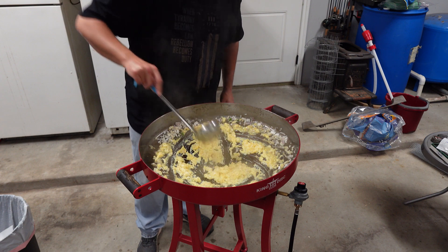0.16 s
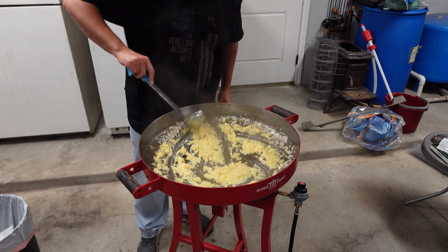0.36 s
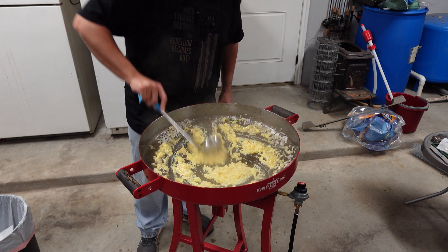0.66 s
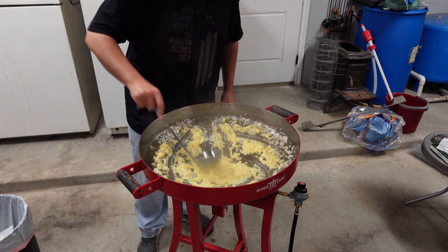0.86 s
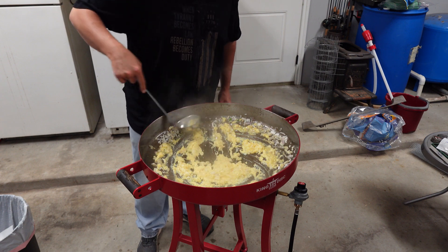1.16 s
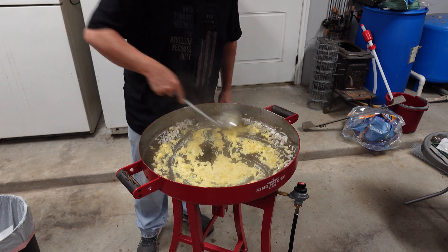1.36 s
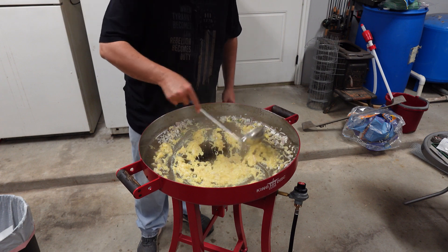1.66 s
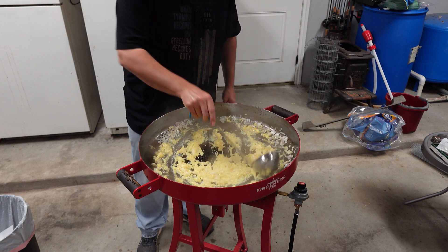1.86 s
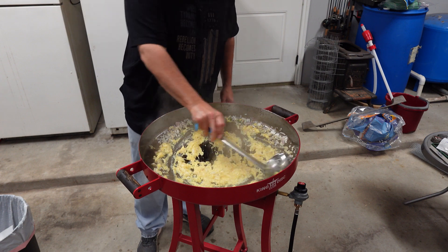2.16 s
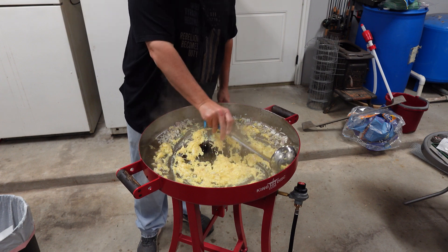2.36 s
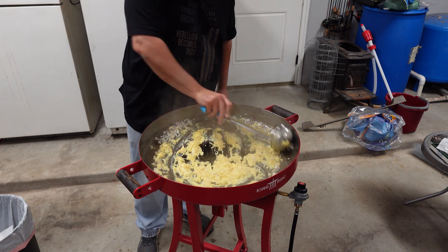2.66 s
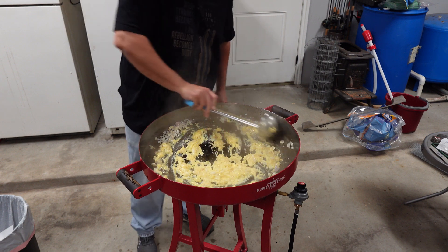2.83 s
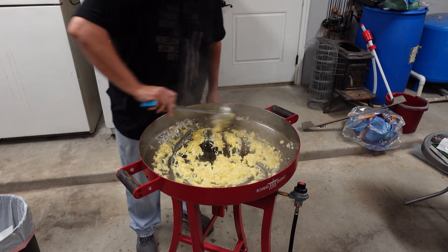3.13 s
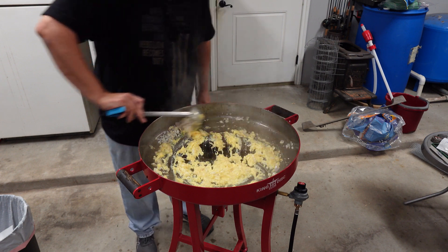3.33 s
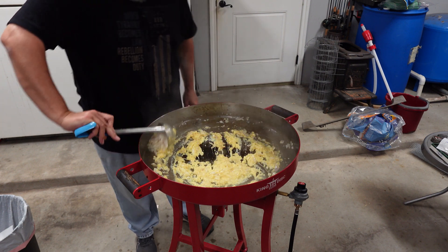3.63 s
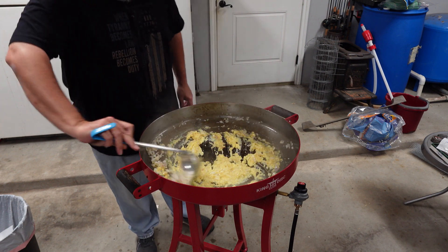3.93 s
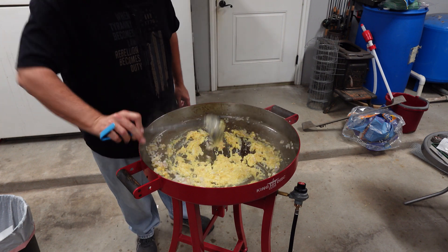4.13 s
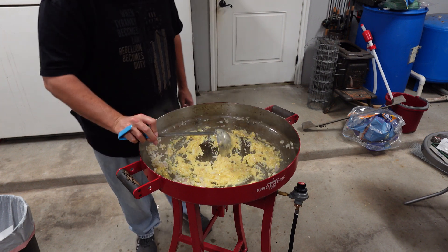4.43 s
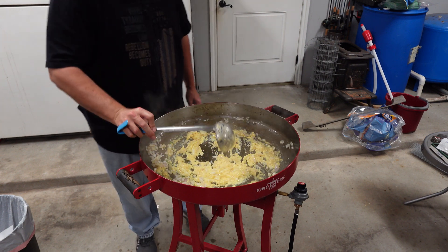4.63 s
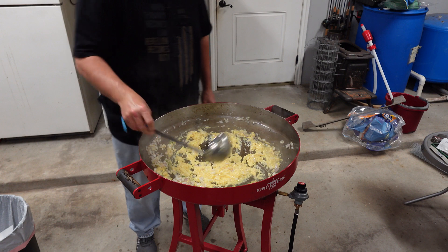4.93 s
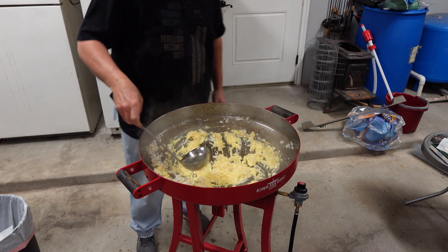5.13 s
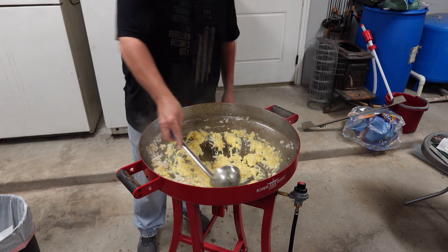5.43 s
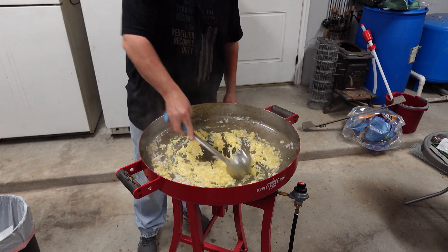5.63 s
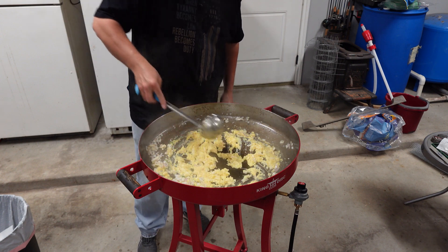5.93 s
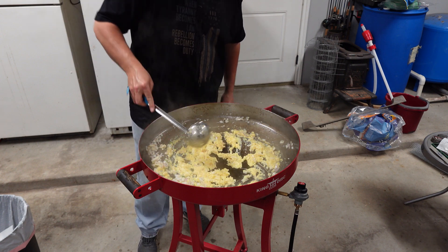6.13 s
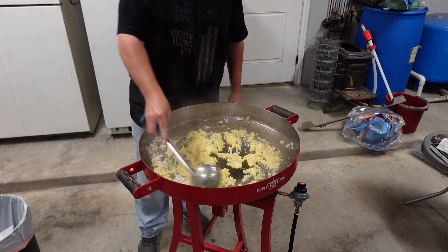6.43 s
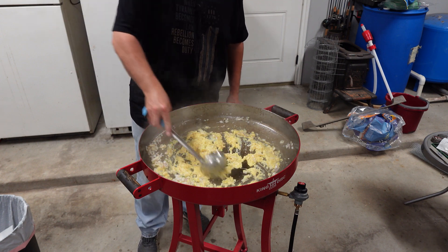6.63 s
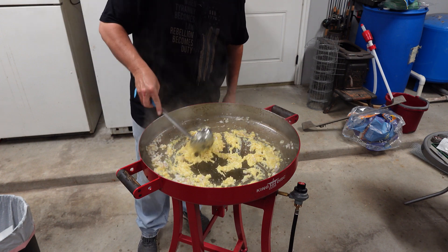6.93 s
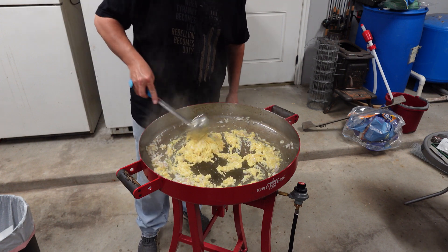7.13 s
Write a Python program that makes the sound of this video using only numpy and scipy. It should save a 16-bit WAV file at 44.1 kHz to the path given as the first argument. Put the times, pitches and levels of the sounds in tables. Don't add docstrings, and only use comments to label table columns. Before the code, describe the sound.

A close microphone hears a big steel pan of eggs frying in a garage: constant fine fizz, scattered oil pops and a very low burner roar. The pan rim is already humming at the start. At 0.5-0.9 s the ladle clacks, nudges and scrapes softly, with dull thumps from the stand. A very loud clang hits at 1.2 s, with a bright double hit near 1.34 s, a duller knock at 1.5 s, and another very loud, rounder clang at 2.1 s with a follow-up at 2.25 s. From 2.5 to 3.9 s a gritty metallic scrape travels round the wall, strongest around 2.85-3.25 s, then weakens with small taps. From 4 to 5.5 s only quieter sizzle and a faint rim ring remain. A harsh, bright sweep with clicks bursts at 5.55-5.88 s; frying swells and pops around 6 s. A light tick and scrape comes at 6.75 s, then sizzling continues to 7.3 s.

```python
import sys
import numpy as np
from scipy import signal
from scipy.fft import rfft, irfft, next_fast_len
from scipy.io import wavfile
from scipy.ndimage import uniform_filter1d, map_coordinates

SR = 44100
rng = np.random.default_rng(int(sys.argv[2]) if len(sys.argv) > 2 else 0)


def invert_db(level):
    return 10 ** (np.asarray(level, dtype=float) / 20)


def persist_wave(psi):
    counts = np.round(np.clip(psi, -1, 1) * 32767).astype(np.int16)
    wavfile.write(sys.argv[1], SR, np.atleast_2d(counts).T)


N = 321489

RIM_BLOWS = [
    0,
    1.348,
    2.10,
    3.55,
]
RIM_HZ = [554.3, 585.2, 707.6, 732.6, 869, 883, 896.7, 1058.5]
# [t60/s, start level/dB rms after each of the first three blows]
RIM_MODES = [(3.77, -35, -32.5, -52), (4.2, -54, -59, -70), (4, -36.5, -53, -41), (1.34, -34.5, -51, -29.5),
             (1.22, -34, -59, -30), (0.75, -70, -65, -23), (3.2, -38.5, -45, -50), (2.15, -43.5, -45, -62)]
RIM_LIFT_DB = [-60.5, -80, -52, -46.5, -68, -81, -66, -48.5]
LIFTED_RING = 1.43
RIM_TOUCH_S, RIM_TOUCH_DB = .493, -5

# [t/s, fizz level/dB]
FIZZ = [(0, -37.5), (.45, -43.5), (1.1, -42), (1.5, -41), (1.899, -43), (2.15, -47.5), (2.4, -47),
        (3.198, -40.5), (4.062, -50.5), (4.6, -50.5), (5.3, -52), (5.6, -51.5), (5.9, -41), (6.25, -44),
        (6.44, -46.5), (6.8, -45.5), (7.29, -42)]
# [f/Hz, level/dB]
FIZZ_COLOUR = [(300, -14), (900, -5.5), (2500, -4.5), (4200, -4), (6400, 0), (8000, -2.5), (9500, -11.5),
               (16000, -18.5)]
# [t/s, peak level/dB, f/Hz]
POPS = [(0.232, -25, 7000), (0.4325, -31, 6840), (0.618, -19, 5650), (0.6345, -17, 2650),
        (1.149, -28, 6800), (1.154, -25, 8200), (1.5714, -30, 5670), (1.582, -24, 6700), (1.961, -27, 6100),
        (1.995, -27, 7100), (2.505, -35, 2750), (4.145, -32, 6140), (4.342, -26.5, 6940),
        (5.179, -34, 7550), (5.5194, -32, 7000), (5.9554, -31, 2830), (5.9884, -28, 6750),
        (6.067, -23, 4500), (6.1203, -25, 4700), (6.135, -21.5, 2540), (6.23, -26, 6900),
        (6.2862, -34, 7070), (6.329, -29, 4500), (6.4807, -30, 6240), (6.63, -37, 6130),
        (6.8916, -28, 6600), (6.94, -32, 6910), (7.046, -30, 5840), (7.088, -27, 7040),
        (7.1867, -23.5, 6500), (7.2485, -37, 4890)]
POP_SAMPLES = 130

# [f/Hz, level/dB]
BURNER_COLOUR = [(25, -9), (70, -14), (120, -2), (155, -3.5), (200, -11), (400, -12), (1500, -19.5),
                 (16000, -34)]
BURNER_DB = -54

# [t/s, peak level/dB, treble share/dB, ring t60/s, bowl share/dB]
KNOCKS = [(.001, -24, -22, 0.92, -7), (0.492, -12.5, -7, 0.018, 0.5), (0.511, -23, 12.5, 0.036, 8),
          (.646, -18.5, -8.5, 0.23, -4.5), (.734, -30, -17, 0.098, 8), (0.753, -20.5, -23, 0.13, -4),
          (1.212, 0.5, 1, 0.37, -1), (1.307, -16.5, -20, 0.036, 12), (1.338, -6, -1, 0.12, -18),
          (1.348, -15, -20, 0.13, 7.5), (1.52, -16.5, -23, 0.49, -1), (2.099, 0.5, -14.5, 0.37, -1.5),
          (2.254, -10.5, -8, 0.16, -2.5), (2.429, -34, -30, 0.079, -1), (2.535, -26.5, 8, 0.21, -21.5),
          (3.797, -28, -5, 0.06, -13), (5.52, -35, 1, 0.043, -10), (5.561, -23, -11, 0.13, -19),
          (5.728, -12, -17, 0.08, -32), (5.752, -29, -4, 0.19, -25), (6.748, -20, 3, 0.067, -4),
          (6.754, -27.5, -11, 0.17, 1.5), (5.623, -24, -4, 0.044, -27), (5.6487, -27, -1, 0.043, -36),
          (5.706, -22, 2, .04, -25), (5.845, -22.5, -10, 0.11, -8), (2.5948, -24, 3, .04, -18),
          (2.6165, -21, 1, 0.048, -9), (2.844, -26, -2, 0.039, 2), (3.421, -30, 0.5, .05, -13),
          (1.365, -32, -14, 0.054, 15), (1.241, -28, -4, 0.058, -8), (.776, -28, -15, .06, -1)]
CLANG_ROWS = [
    6,
    8,
    9,
    11,
]
# [f/Hz, t60/s, level/dB in each of the four clangs]
BOWL = [(338.4, 0.29, -11, -22, -30, -1.5), (512, 0.52, -50, -50, -16, -2.5), (607, 0.45, -27, 9, 9, -7),
        (673, 0.52, -30, -30, 3.5, -5), (868, 0.67, -32, -25, -1, -14), (945, 0.4, -32, -26, -8, -18),
        (978, .69, 5, 0, 1, 6), (1007, 0.94, -13, -24, -7, 1.5), (1080, 0.53, -14, -2, 4, 4),
        (1138, 0.5, -11.5, -14, 2, -8), (1134, 0.4, -13, -15, 1, -8), (1286, 0.39, -24, -14, -1, -9),
        (1402, 0.42, -24, -8, -2, -1), (1455, 0.3, -12, -8, -18, -8)]
# [f/Hz, t60/s, level/dB in each of the four clangs]
BOTTOM = [(1617, .4, -23, -28, -30, -5), (1815, 0.56, -22, -32, -25, -6), (1760, 0.53, -25, -30, -18, -7),
          (1820, 0.53, -35, -30, -21, -13), (2024, 0.51, -46, -24, -25, -5.5),
          (2337, 0.19, -1.5, -4, -25, -17), (2563, 0.3, -7, -1, -25, -2), (2584, 0.092, 7, 16.5, -25, -10),
          (2643, 0.28, -3, -2, -20, -14), (2885, 0.41, -17, -2, -25, 1.5)]
# [f/Hz, t60/s, level/dB in each of the four clangs]
WALL = [(3140, 0.46, -16, -15, -30, -23), (3500, 0.34, -22, -23, -30, -8), (3600, .6, -25, -6, -32, -6),
        (3730, 0.57, -27, -3, -30, -4), (3920, 0.44, -21, -2, -30, 0), (4180, 0.18, -24, -23, -30, 5),
        (4600, 0.12, -29, -19, -30, 3), (5340, 0.35, -38, -23, -30, 2), (5419, 0.68, -36, -2, -37, -20),
        (8500, 0.61, -20.5, -6, -40, -33), (6130, 0.049, 3, -32, -30, 12), (6750, 0.8, -31, -5, -28, -12),
        (7000, 0.45, -24, 0, -30, -11), (7434, 0.17, -9, -17, -30, -28)]
WANDER_DB = 2.2
CRACK_SAMPLES = 600
CONTACT_S, SOFTER_PER_DB = 0.0013, 0.09
RISE_SHARE = 0.24
FLOOR_DB, FLOOR_DB_PER_DOUBLING, USUAL_RING_S = -1, 1.44, 0.2
WASH_T60_S = .45, .27
# [f/Hz, level/dB]
CLUSTERS = [(1900, -3.5), (2600, 2), (3200, -3.5), (3900, 1), (4700, -7), (5400, -0.5), (6200, -7),
            (7000, -1)]

# [t/s, peak level/dB, t60/s]
THUMPS = [(0.066, -24, 0.4), (0.645, -18, 0.43), (0.748, -22.5, 0.23), (0.853, -21.5, 0.51),
          (.927, -25.5, 0.42), (1.238, -27, 0.86), (1.399, -36, 0.16), (1.519, -15, 0.31),
          (1.589, -20, 0.29), (1.659, -26, 0.34), (1.719, -29.5, 0.54), (2.24, -26, 0.29),
          (3.619, -42, 0.23), (3.867, -30.5, 0.33), (3.953, -29.5, 0.54), (5.563, -37, 0.45)]
# [f/Hz, level/dB, share of the thump's t60]
STAND = [(117, -36, 1.4), (181.6, -5.5, 0.5), (251, -11, 1.2), (305.5, 6, 0.31), (329.5, -1.5, 0.27),
         (440, -3.5, 0.59)]
JOLT_S = 0.0062

# [t/s, peak level/dB, f/Hz, t60/s]
TINKS = [(0.492, -18, 1250, 0.023), (0.76, -23, 1570, .06), (0.76, -27, 2640, 0.15), (1.3, -20, 1250, 0.12),
         (1.35, -17, 1130, 0.08), (2.44, -29, 978, 0.1), (3.797, -23, 1450, 0.079),
         (3.54, -28, 2400, 0.061), (3.42, -25, 2700, .15), (5.625, -27.5, 1450, .12),
         (3.79, -30.5, 1120, 0.14), (5.5195, -42, 2000, 0.018), (2.535, -29.5, 2370, .08),
         (2.645, -27, 978, 0.26), (2.85, -23, 900, 0.15), (.731, -30, 5200, .07), (1.338, -21, 10600, .035),
         (5.648, -18, 6470, .05), (5.638, -19, 5295, .1), (1.36, -24, 5419, .35), (1.36, -27, 3760, .25),
         (5.748, -13.5, 3500, .06), (5.727, -20, 4900, .07), (5.62, -23, 2800, 0.089),
         (5.727, -21, 1480, 0.13), (5.81, -25, 6850, .08), (2.135, -12.5, 980, 0.31),
         (1.238, -36, 7434, 0.1), (1.238, -22, 2620, .1), (6.765, -37, 940, .15), (1.275, -22.5, 554, 0.31),
         (1.56, -27, 1000, 0.19), (1.41, -25, 1200, 0.12), (.734, -20, 940, 0.13), (3.53, -31, 1160, 0.087),
         (2.535, -36, 1100, .06), (6.75, -30, 4800, .04), (.775, -28, 1650, .04),
         (5.844, -21.5, 1245, 0.057), (6.828, -33, 1480, 0.1), (6.845, -33, 1430, .07),
         (7.186, -46, 1600, .04)]
TINK_RISE_S = 0.0026

# [t/s, pressure level/dB, lean/dB], a higher lean lies flatter on the bowl
NUDGE = [(.52, -63, -8), (.608, -43, 0), (.616, -40, 1), (.646, -44, 5.5), (.728, -44, 3),
         (.74, -30.5, 3.5), (.79, -37, 3), (.822, -54, 8), (1.05, -51.5, 0.5)]
# [t/s, pressure level/dB, lean/dB]
ROUND_NEAR = [(2.502, -63, 4), (2.538, -41.5, 2), (2.61, -36, -1), (2.654, -32.5, -1.5), (2.698, -36, 3.5),
              (2.75, -30.5, -1.5), (2.84, -34, 1)]
# [t/s, pressure level/dB, lean/dB]
ROUND_FAR = [(2.841, -29.5, 1), (2.87, -26.5, -4.5), (3.0, -28, -4), (3.156, -29.5, -1), (3.194, -34, 3),
             (3.212, -24, -3.5), (3.405, -36, 0.5), (3.425, -31.5, -1), (3.598, -35, -1)]
# [t/s, pressure level/dB, lean/dB]
ROUND_END = [(3.599, -37, -2.5), (3.756, -40.5, -0.5), (3.816, -35, -1), (3.88, -41.5, -1.5),
             (3.924, -38.5, -3), (3.942, -63.5, 10.5), (4.05, -63, 2.5)]
# [t/s, pressure level/dB, lean/dB]
SWEEP = [(5.558, -71, -10), (5.564, -37.5, -3), (5.58, -37, -7), (5.65, -18, -19), (5.69, -21, -13),
         (5.761, -22, -4), (5.78, -31.5, -0.5), (5.845, -27, -1.5), (5.885, -66, -2)]
# [t/s, pressure level/dB, lean/dB]
TOUCH = [(6.57, -50, 0.5), (6.61, -49, -6.5), (6.733, -55, 0), (6.752, -26, -3.5), (6.77, -59, -3),
         (6.83, -58, 7.5), (6.85, -48.5, 3.5), (7.0, -73, -9)]
DRAGS = [NUDGE, ROUND_NEAR, ROUND_FAR, ROUND_END, SWEEP, TOUCH]
PLACES_ON_PAN = [
    (0.02, 0.1, 1.6),
    (.95, 1.2, 1.24),
    (1.9, 3.05, 1.35),
    (3.2, 3.85, 1.04),
    (3.95, 3.7, 1.2),
    (.6, 0.54, 3.2),
]
# [f/Hz, width/Hz, level/dB at each of the five places]
BOWL_DRAG = [(608, 115, -32, -6, -3, 1, -31), (976, 30, 8, 2.5, 4.5, -15, 13),
             (1116, 18, -1, -5, -7, -0.5, 3.5), (1292, 50, 0.5, 0, -21, -3.5, -5),
             (1455, 57, 2.5, 5, -2.5, -2.5, 9.5), (1553, 220, -4, -18, -22, -2, -10),
             (2020, 13, -11, -1, -24, -1, -23), (2334, 31, -3, 2.5, -1, 6, 1),
             (2540, 41, -6, -3, -4, 5, -2), (2683, 100, -0.5, 1, 1.5, 2, -7),
             (2767, 84, -5, 5.5, -7, 1, -1), (2930, 86, 1.5, -4, -4, 2.5, -18),
             (3198, 180, -10, -9, -5, -1, -16)]
# [f/Hz, width/Hz, level/dB at each of the five places]
EDGE_DRAG = [(3460, 210, 15, -4, -8, 6.5, -3), (3678, 90, 15, 7.5, -5, 5, 4),
             (4040, 134, -5, 3.5, -2, -2, 0.5), (4500, 76, 6, 4.5, -16, 5.5, -10),
             (5010, 59, -20, 1.5, -7, 7, -4), (5170, 70, 3, 2, -10, -12, 0),
             (5415, 72, 3, 3, -0.5, -1.5, -4), (5813, 110, -16, -10, -8, -7, -13),
             (6430, 190, -23, -2, 0, -2, -4), (6710, 210, -5, 1.5, -3.5, -6, 0),
             (6810, 155, -16, 9, 5, 0.5, -0.5), (7370, 140, -11, -6, -5, -4, -11),
             (8290, 180, -40, -4, -14, -9.5, -6), (9750, 120, -28, -16, -10, -18, -14)]
# [f/Hz, width/Hz, level/dB]
GRIT = [(880, 640, -10), (2440, 260, -16), (5970, 7800, -18), (10160, 510, -13.5), (12000, 400, -16),
        (13600, 420, -21), (15400, 600, -12)]
# [f/Hz at start, f/Hz at end, level/dB against the edge]
POCKET = [(2280, 2530, -10), (3800, 3900, -15), (3360, 2320, -6), (2300, 2080, -12), (2700, 2916, -6.5),
          (3000, 2500, -2.5)]
POCKET_WIDTH_HZ = 176
FLAT_DB, FLAT_SLOPE = -1.5, 1.84
NOTCH_GAP_HZ = 400
ROLL_DB = 2.5

# [f/Hz, level/dB]
MIC = [(500, -1.5), (750, -6), (1100, 1), (3300, -1), (5000, 5), (8500, 2), (10500, -9), (16000, -16)]
TOP_HZ, CEILING = 15800, .76


def unit(x):
    return x / np.sqrt(np.mean(x ** 2))


def colour(x, points):
    size = next_fast_len(len(x))
    hz, db = np.transpose(points)
    axis = np.maximum(np.arange(size // 2 + 1) * SR / size, 1)
    gain = invert_db(np.interp(np.log(axis), np.log(hz), db))
    return irfft(rfft(x, size) * gain, size)[:len(x)]


def high_pass(x, hz, order):
    return signal.sosfilt(signal.butter(order, hz, "highpass", fs=SR, output="sos"), x)


def sliding_band(x, hz, width_hz):
    turn = np.exp(2j * np.pi * np.cumsum(hz) / SR)
    smooth = signal.butter(2, width_hz / 2, fs=SR, output="sos")
    return (signal.sosfilt(smooth, x / turn) * turn).real


def octave_bands(t60_low, t60_high):
    for octave in range(6):
        edges = [250 * 2 ** octave, 500 * 2 ** octave]
        t60 = t60_low * (t60_high / t60_low) ** (octave / 5)
        yield signal.butter(2, edges, "bandpass", fs=SR, output="sos"), t60


def ring(hz, gain, t60, seconds):
    t = np.arange(int(seconds * SR))[:, None] / SR
    return (np.sin(2 * np.pi * hz * t) * np.exp(-np.log(1000) * t / t60)) @ gain


def add(out, s, x):
    i = int(s * SR)
    out[i:i + len(x)] += x[:N - i]


def walk(rate):
    levels = rng.standard_normal(size=2000)
    return unit(map_coordinates(levels, [np.arange(N) / SR * rate], order=1))


def grains(rate, spread_db):
    size_db = spread_db * np.minimum(rng.exponential(size=N), 5)
    size = invert_db(size_db) * np.sign(rng.standard_normal(N))
    return unit(size * (rng.random(N) < rate / SR))


def rim():
    out = np.zeros(N)
    hz = np.array(RIM_HZ)
    t60, *starts = np.transpose(RIM_MODES)
    for s, until, db in zip(RIM_BLOWS, RIM_BLOWS[1:] + [N / SR], starts + [RIM_LIFT_DB]):
        longer = LIFTED_RING if s == RIM_BLOWS[-1] else 1
        tone = ring(hz, np.sqrt(2) * invert_db(db), t60 * longer, until - s)
        age = np.arange(len(tone)) / SR + (s == 0)
        add(out, s, tone * (1 - np.exp(-age / 0.0052)))
    touch_s = [RIM_TOUCH_S, RIM_TOUCH_S + 0.019, RIM_BLOWS[1] - .03, RIM_BLOWS[1]]
    touched = np.interp(np.arange(N) / SR, touch_s, [0, 1, 1, 0])
    return out * invert_db(RIM_TOUCH_DB * touched)


def frying():
    s, db = np.transpose(FIZZ)
    bubbles = grains(2500, 3.64) * invert_db(1.1 * walk(14)) + 0.98 * rng.standard_normal(N)
    fizz = unit(colour(bubbles, FIZZ_COLOUR)) * invert_db(np.interp(np.arange(N) / SR, s, db) + 0.5)
    pops = np.zeros(N)
    t = np.arange(POP_SAMPLES) / SR
    for s, db, hz in POPS:
        bubble = np.sin(2 * np.pi * hz * t) * np.exp(-t / 0.001)
        spray = 0.59 * rng.standard_normal(POP_SAMPLES) * np.exp(-t / 0.0019)
        add(pops, s, invert_db(db) * (bubble + spray))
    return fizz + colour(pops, [(300, -5), (2000, -5.0), (9000, -2.5), (16000, -21)])


def burner():
    flutter = invert_db(0.91 * walk(9))
    return unit(colour(rng.standard_normal(N) * flutter, BURNER_COLOUR)) * invert_db(BURNER_DB)


def knocks():
    hz, t60, *clangs = np.transpose(BOWL + BOTTOM + WALL)
    out, crack, floor = np.zeros(N), np.zeros(N), np.zeros(N)
    for k, (s, db, treble_db, long_s, bowl_db) in enumerate(KNOCKS):
        long_s = np.clip(long_s, .02, .8)
        mix, detune = rng.standard_normal((2, len(hz)))
        if k in CLANG_ROWS:
            mode_db = clangs[CLANG_ROWS.index(k)]
            struck_hz = hz
        else:
            mode_db = np.median(clangs, axis=0) + WANDER_DB * mix
            struck_hz = hz * (1 + 0.0019 * detune)
        treble_lift_db = (treble_db + 3.5) * np.clip(np.log2(hz / 1800), 0, 1)
        gain = invert_db(db - 17.0 + mode_db + treble_lift_db + bowl_db * (hz < 1500))
        add(out, s, ring(struck_hz, gain, t60 * long_s / 0.65, 1.8 * long_s))

        contact_s = CONTACT_S * np.exp(-SOFTER_PER_DB * treble_db)
        age = np.arange(CRACK_SAMPLES) / (contact_s * SR)
        spray = rng.standard_normal(CRACK_SAMPLES) * np.exp(-age) * (1 - np.exp(-age / RISE_SHARE))
        snap = colour(spray, [(250, -6.5 + bowl_db), (1200, 11.0 + bowl_db), (4000, treble_db),
                              (8500, treble_db - 8.5), (16000, treble_db - 22)])
        snap = invert_db(db) * snap / np.abs(snap).max()
        add(crack, s, snap)
        floor_db = FLOOR_DB + FLOOR_DB_PER_DOUBLING * np.log2(long_s / USUAL_RING_S)
        add(floor, s, invert_db(floor_db) * snap)
    return out + invert_db(-1.5) * crack, invert_db(-0.5) * floor


def wash(x, t60_low, t60_high):
    out = np.zeros(N)
    for sos, t60 in octave_bands(t60_low, t60_high):
        keep = 1e-6 ** (1 / (SR * t60))
        energy = signal.lfilter([1 - keep], [1, -keep], signal.sosfilt(sos, x) ** 2)
        out += np.sqrt(energy) * unit(signal.sosfilt(sos, rng.standard_normal(N)))
    return out


def stand():
    hz, mode_db, share = np.transpose(STAND)
    out, shake = np.zeros(N), np.zeros(N)
    for s, db, t60 in THUMPS:
        t60 = np.clip(t60, .05, .8)
        gain = invert_db(db - 15 + mode_db + 3 * rng.standard_normal(len(hz)))
        tone = ring(hz, gain, t60 * np.minimum(share, 1.2), 1.5 * t60)
        add(out, s, tone * (1 - np.exp(-np.arange(len(tone)) / (JOLT_S * SR))))
        add(shake, s, invert_db(db) * 0.00021 ** (np.arange(int(t60 * SR)) / (t60 * SR)))
    rattle_colour = [(70, -12.5), (130, 1.5), (450, -3.0), (900, -12.0), (2000, -37)]
    rattle = unit(colour(rng.standard_normal(N), rattle_colour))
    return colour(out, [(60, -16), (110, 1.0), (1000, 8.5)]) + invert_db(-18.0) * shake * rattle


def tinks():
    out = np.zeros(N)
    for s, db, hz, t60 in TINKS:
        tone = ring(np.array([hz]), invert_db([db]), t60, t60)
        add(out, s, tone * (1 - np.exp(-np.arange(len(tone)) / (TINK_RISE_S * SR))))
    return out


def scrape():
    unevenness = invert_db(0.63 * walk(60) + 0.47 * walk(200))
    slips = (grains(3000, 4.85) + rng.standard_normal(N)) * unevenness
    wander = [walk(22) for _ in range(8)]
    glide = np.cumsum(.024 * walk(7))
    rasp = [(hz, width, db, db, db, db, db) for hz, width, db in GRIT]
    modes = BOWL_DRAG + EDGE_DRAG + rasp
    gaps = np.abs(np.diff([row[0] for row in modes], prepend=0))
    signs = np.cumprod(np.where(gaps > NOTCH_GAP_HZ, 1, -1))
    out = np.zeros(N)
    for table, (start, end, damping), (*pocket_hz, pocket_db) in zip(DRAGS, PLACES_ON_PAN, POCKET):
        s, pressure_db, lean_db = np.transpose(table)
        part = slice(int(s[0] * SR), int(s[-1] * SR))
        t = np.arange(N)[part] / SR
        place = np.interp(t, s[[0, -1]], [start, end])
        groups = [0, 0, 0]
        for k, (hz, width, *db) in enumerate(modes):
            b, a = signal.iirpeak(hz, max(hz / (damping * width), .8), SR)
            group = int(hz > 1200) + int(hz > 3200)
            swing = invert_db(np.interp(place, np.arange(len(db)), db) + ROLL_DB * wander[k % 8][part])
            groups[group] = groups[group] + signs[k] * swing * signal.lfilter(b, a, slips[part])
        pocket_path = np.interp(t, s[[0, -1]], pocket_hz)
        pocket = sliding_band(slips[part], pocket_path, POCKET_WIDTH_HZ)
        bent = np.arange(len(t)) + glide[part] - glide[part].mean()
        shares_db = (FLAT_DB + FLAT_SLOPE * lean_db, lean_db, 0, pocket_db)
        for x, share_db in zip(groups + [pocket], shares_db):
            gain = uniform_filter1d(invert_db(np.interp(t, s, pressure_db + share_db)), size=300)
            out[part] += unit(map_coordinates(x, [bent], mode="mirror")) * gain
    return invert_db(-2.0) * high_pass(out, 513, order=8)


def garage_echo(near):
    t = np.arange(SR) / SR
    tail = np.zeros(SR)
    for sos, t60 in octave_bands(0.67, 0.42):
        tail += signal.sosfilt(sos, rng.standard_normal(SR)) * np.exp(-np.log(1000) * t / t60)
    tail = tail / np.sqrt(np.sum(tail ** 2))
    return signal.fftconvolve(near, np.pad(tail, (int(.008 * SR), 0)))[:N]


def scene():
    blows, floor = knocks()
    drag = scrape()
    lingering = colour(wash(floor + invert_db(-12.5) * drag, *WASH_T60_S), CLUSTERS)
    lingering = colour(lingering, [(330, 7.5), (480, -5.5), (760, 1.5), (1100, 4.0),
                                   (1800, 2.5), (7000, 2.5), (9000, 0.5), (12000, 3)])
    steel = blows + tinks() + drag + lingering
    near = colour(high_pass(steel, 305, order=5), MIC) + stand() + frying()
    mono = near + invert_db(-10.0) * garage_echo(near) + rim() + burner()
    side_colour = [(25, -10), (120, -14), (300, -17), (700, -26), (2000, -55)]
    side = invert_db(-79.5) * unit(colour(rng.standard_normal(N), side_colour))
    return mono + side * np.array([[1], [-1]])


def band_limit(x):
    return signal.sosfilt(signal.butter(12, 16510, fs=SR, output="sos"), x)


def record(dry):
    top = signal.ellip(10, .2, 70, TOP_HZ, fs=SR, output="sos")
    rounding = CEILING * np.tanh(dry / CEILING) - dry
    rounded = dry + high_pass(rounding, 110, order=2)
    mix = signal.sosfilt(top, invert_db(-.5) * rounded)
    return band_limit(mix)


dry = scene()
out = record(dry)
persist_wave(out)
```